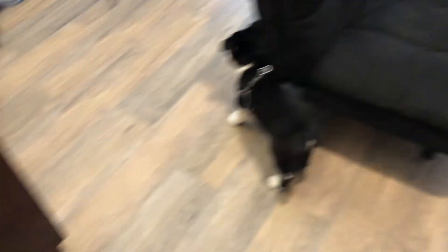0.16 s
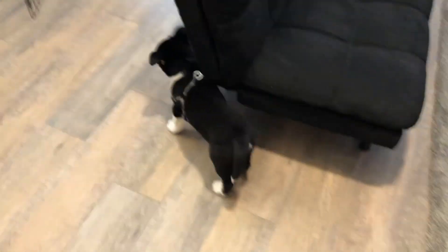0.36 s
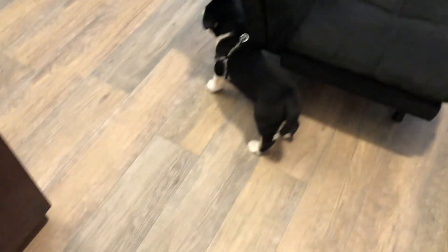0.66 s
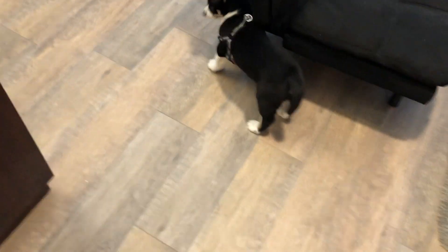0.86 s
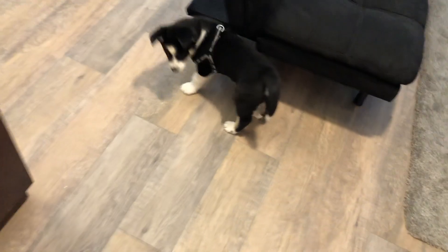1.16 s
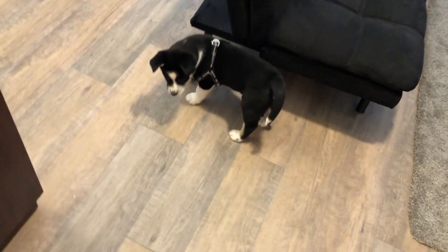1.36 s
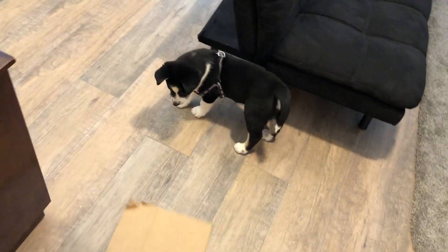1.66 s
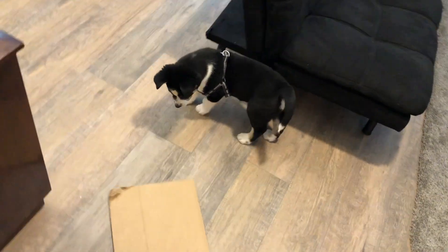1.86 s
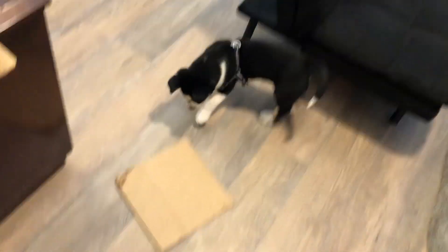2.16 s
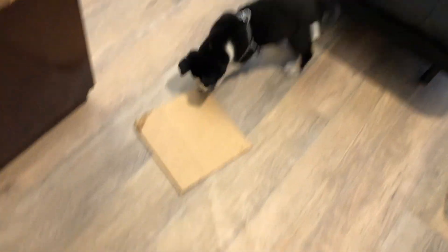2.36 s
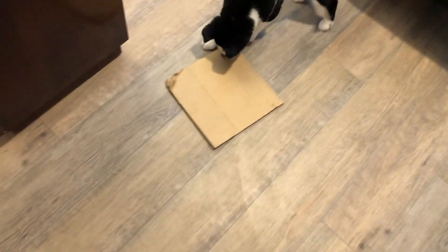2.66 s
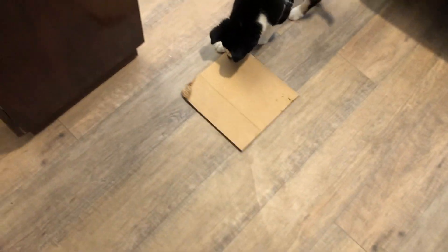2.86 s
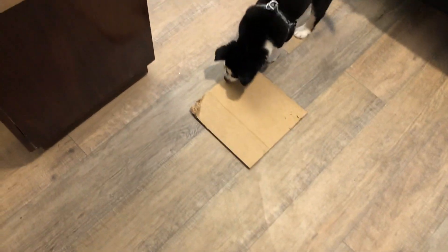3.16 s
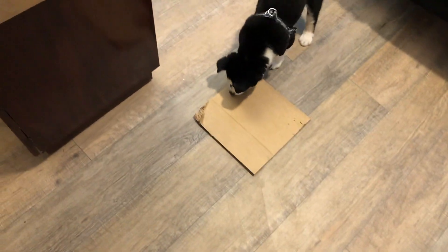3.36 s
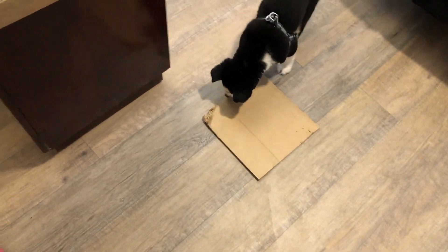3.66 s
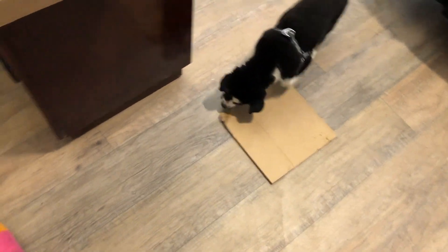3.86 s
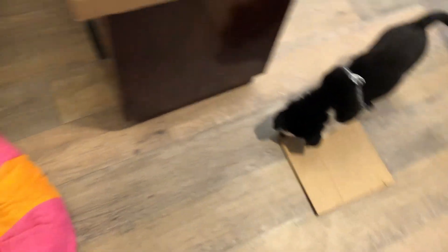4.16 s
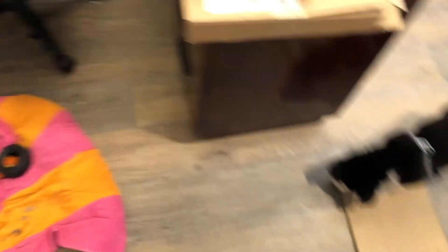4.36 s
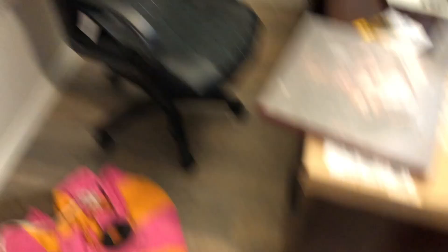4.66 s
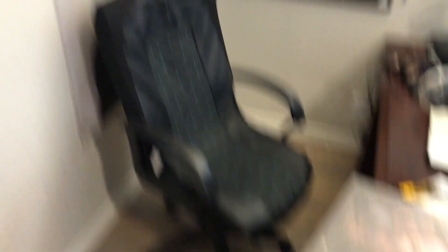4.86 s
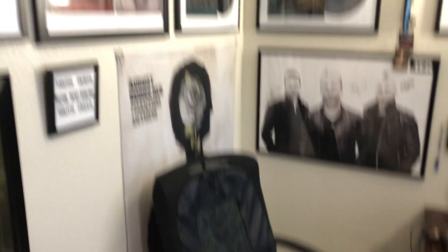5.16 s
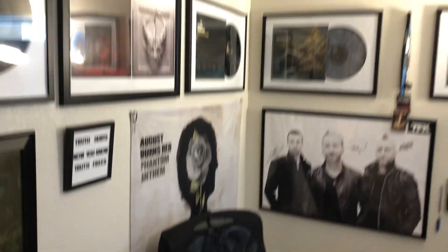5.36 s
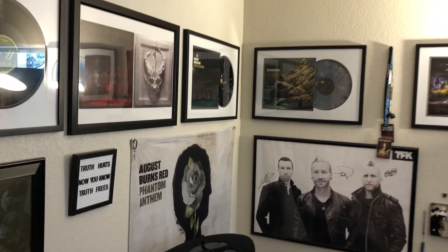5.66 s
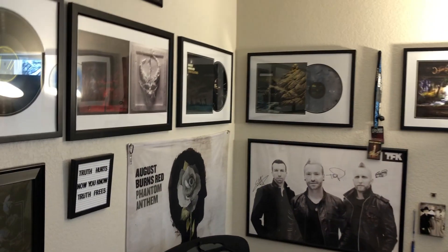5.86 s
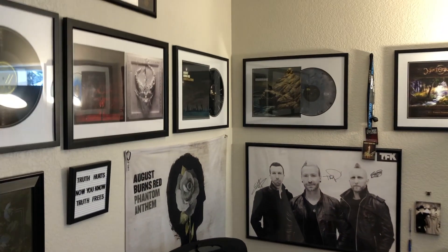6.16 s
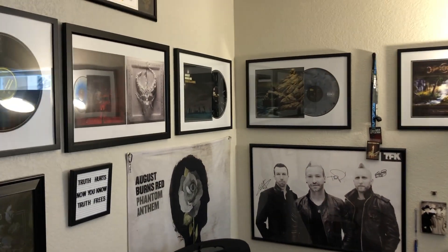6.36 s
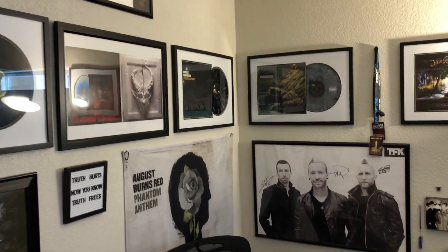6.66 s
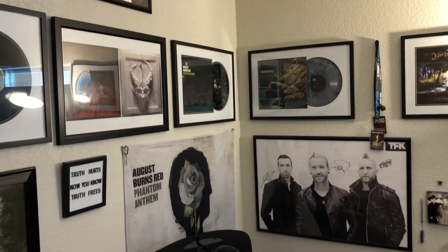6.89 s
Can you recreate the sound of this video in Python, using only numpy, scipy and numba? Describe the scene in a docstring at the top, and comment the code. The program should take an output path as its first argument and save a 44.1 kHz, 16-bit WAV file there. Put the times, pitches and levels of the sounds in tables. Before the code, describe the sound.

Close cardboard scraping and claw clicks on a hard floor in a small room, soft thuds, and later a sharp hollow knock with rebounds.

```python
"""Dense scrapes, ticking, soft thuds, one hard hollow knock and a faint whistle, over a quiet hum.
A puppy noses a sheet of corrugated cardboard about on a hard floor in a small room, a metre or two from a phone.
Scrapes are random slips in moving bands; claws and flutes tick as short noise bursts; thuds, raps and the knock
ring decaying modes. The room adds a brief diffuse tail; the phone's microphone thins the deep bass of the
nearby sounds and cuts the top of everything."""
import sys
import numpy as np
from scipy import signal
from scipy.fft import rfft, irfft
from scipy.io import wavfile
from scipy.ndimage import uniform_filter1d
from numba import njit

SR = 44100
rng = np.random.default_rng(int(sys.argv[2]) if len(sys.argv) > 2 else 0)


def dump(signal):
    """Clip the signal to [-1, 1] and save it as 16-bit WAV at the path in sys.argv[1]."""
    limited = np.clip(np.atleast_2d(signal).T, -1, 1)
    pcm = np.round(limited * 32767).astype(np.int16)
    wavfile.write(sys.argv[1], SR, pcm)


N = 309793

# room tone spectrum, before scaling to AIR_DB: (frequency [Hz], relative level per Hz [dB])
AIR_SPECTRUM = [(15, -36.5), (25, -15.5), (270, 7.5), (326, 6), (416, 4), (463, -1), (516, -2.5),
                (623, -5.5), (817, -39.5), (1290, -10), (3330, -15), (3710, -18.5), (12200, -20.5),
                (16000, -22)]
AIR_DB = -64.5  # rms level, before its slow wavering
# appliance motor hum, each line wavering about its level: (frequency [Hz], rms level [dB])
HUM_LINES = [(59.2, -79), (118.4, -77), (177.6, -84.5), (414.5, -74.5), (516.8, -72.5), (576.0, -77.5),
             (807.5, -84)]

# short shoves and stirrings of the sheet: (time at full level [s], rasp level [dB], rise [s], hold [s],
# fade [dB/s], rasp centre [Hz], rasp sharpness [Q], then relative to the rasp level:
# body [dB], fine grit [dB], floor rumble [dB])
SHOVES = [(0.03, -58.5, .05, .03, 102, 2000, 1.5, 5.5, -10, -4.5),
          (0.11, -42, 0.065, .01, 118, 5700, .4, -4.5, -3.5, -21.5),
          (0.18, -54, 0.021, .01, 116, 3920, 0.34, 3.5, 3.5, 3),
          (0.286, -58.5, 0.014, 0.0196, 137.5, 1800, 1.2, 5.5, -1.5, 9),
          (0.424, -61, 0.014, 0.014, 98, 2500, 1.4, 4, 5, 0),
          (0.565, -56, 0.0024, 0.0063, 400, 2580, 2.9, 4.5, -3, 3),
          (0.581, -52.5, .02, .02, 95, 2600, 1.7, 3.5, -5.5, 8),
          (0.661, -58.5, .01, .008, 303, 2500, 1.5, -5, 14, -8),
          (0.672, -24, 0.012, .001, 301, 2400, 1.1, -12.5, -34, -28),
          (0.699, -35, .02, .02, 109, 2520, 0.57, -9, -30.5, -27),
          (0.766, -40, 0.093, 0.012, 141.5, 4480, .5, -11, -11, -21.5),
          (0.955, -66.5, 0.055, 0.031, 61, 2400, 0.76, 1, -1, 8),
          (2.202, -47, .01, .04, 132, 2640, 1.3, -5.5, -15, -13.5),
          (2.468, -62, .1, .005, 114, 3300, 1.1, -19, -9, -8),
          (2.578, -43, .015, .012, 800, 5500, 1.5, -22.5, -13.5, -31),
          (2.626, -46, .06, .005, 122.5, 5100, 0.62, -10, -18.5, -14.5),
          (3.114, -66.5, .03, .04, 200, 3000, 1.2, -12.5, -7.5, -17),
          (3.254, -69, .05, .005, 128.5, 4580, 1.2, -29, -4.5, -18),
          (3.448, -69.5, .05, .005, 103, 4750, 1.3, -9, -2.5, -9),
          (3.638, -71.5, .1, .005, 82.5, 2470, 1.2, -4.5, -13, -3),
          (3.816, -53, .01, .04, 96, 2700, .9, -9.5, -8.5, -19),
          (3.945, -52.5, 0.11, 0.017, 129, 3340, 0.65, -7, -8.5, -12),
          (4.254, -69.5, .02, .09, 150, 2330, 0.97, 0.5, -6, -9),
          (4.388, -50.5, .016, .07, 124, 3000, 0.44, -19, -11, -30),
          (4.52, -67.5, 0.23, 0.013, 117, 1620, 4.3, 7.5, -20, -2),
          (4.744, -67, .2, .005, 65, 1750, 1.6, 2.5, -21, -4),
          (5.184, -63.5, 0.39, .005, 173, 2030, 1.6, -0.5, -14, -18),
          (5.362, -60.5, .1, .005, 117.5, 2850, .7, -6.5, -6, -46),
          (5.544, -48.5, 0.12, .08, 299, 1900, 0.75, 1.1, -7, -26),
          (5.638, -40.5, 0.007, .076, 190, 2200, .4, 6.5, -23, -16),
          (5.662, -42, 0.024, 0.018, 253, 6020, .6, -9, -6, -25),
          (5.852, -50, 0.11, 0.017, 103, 2940, 0.67, -2, -6.5, -21),
          (5.93, -62.5, .15, .005, 102.5, 2940, 0.83, 1, -3, -27),
          (6.032, -59.5, .1, .005, 43.5, 2130, 1.1, -2, -3.5, -4.5),
          (6.312, -56, .03, .005, 248, 2650, 1.2, -7, -18, -19),
          (6.38, -59.5, .1, .005, 83, 3200, .4, -5.5, -6.5, -18),
          (6.574, -61.5, 0.39, .005, 126, 3250, .8, -7, -4, -19),
          (6.78, -61.5, 0.11, 0.0069, 204, 3700, .9, -4, -6, -12),
          (6.842, -46, 0.071, .005, 134, 3300, 0.8, -10.5, -7, -12)]
RISE_DB = 22.5  # climb to full level over the rise time
SAG_S, SLOW_HZ = .25, 2400  # the rasp centre moves toward SLOW_HZ with this time constant as a shove slows
LOW_FADE, GRIT_FADE = 0.84, 1.87  # fade rates of body and rumble, and of grit, relative to the rasp
# the long skid across the floor:
# (time [s], rasp level [dB], rasp centre [Hz], body level [dB], grit level [dB])
SKID = [(1.145, -68, 4070, -58, -68), (1.168, -44, 4520, -61.5, -50), (1.177, -25, 5260, -51.5, -39),
        (1.25, -24.5, 6000, -49.5, -36.5), (1.3, -31, 4650, -52.5, -46), (1.352, -32, 3580, -52, -48),
        (1.378, -29, 3150, -56.5, -45), (1.46, -30, 3550, -43.5, -48), (1.546, -32.5, 3100, -51, -51),
        (1.594, -27, 2900, -39.5, -38.5), (1.628, -31, 2910, -44, -43), (1.7, -38.5, 3500, -49.5, -50),
        (1.742, -36.5, 3790, -49.5, -41), (1.764, -41, 3470, -56, -76), (1.844, -46, 3420, -54.5, -56),
        (1.95, -48.5, 3290, -63.5, -58), (2.09, -46.5, 3100, -55.5, -60), (2.18, -60.5, 3000, -64, -77)]
SKID_SHARPNESS_PER_KHZ, SKID_RUMBLE_DB = 0.2, -64.5  # the brighter, the sharper the rasp
# the sheet never lies quite still: (rasp [dB], body [dB], grit [dB], rumble [dB])
STIR_DB = (-80, -72, -88, -89)

# room decay by band: (centre [Hz], t60 [s])
ROOM_DECAY = [(150, 0.19), (450, 0.76), (1200, 0.82), (3000, 0.45), (7000, 0.17), (12000, 0.88)]
ROOM_DB = -13  # gain of the unit-energy tail

# claws and flutes catching: (time [s], peak level [dB], centre [Hz], relative snap gain [dB])
TICKS = [(0.08, -30, 7240, -11), (0.287, -38.5, 845, -27), (0.563, -46, 2650, -32),
         (0.6729, -15, 2550, -25), (1.149, -45.5, 1490, -14), (1.156, -44, 3000, -14),
         (1.162, -30, 4000, -5), (1.1737, -20, 7260, -26), (1.487, -21.5, 4760, -1),
         (1.5627, -21.5, 3060, -21), (1.5783, -18.5, 3160, -12), (1.5863, -17, 2380, -34),
         (1.6703, -21.5, 2170, -7), (1.7198, -29, 3580, -14), (1.734, -21.5, 3970, -7),
         (1.8392, -36, 3170, 7), (1.849, -35, 9450, -15), (1.8688, -26.5, 3590, 16), (1.891, -32, 6000, -1),
         (1.913, -31, 3590, 11), (1.918, -27.5, 3400, 12), (1.929, -34, 9000, -5), (1.957, -33, 3640, -2),
         (1.991, -32.5, 3170, 9), (1.999, -39, 3300, 3), (2.0314, -31.5, 3590, -9),
         (2.0522, -34, 3200, -14), (2.056, -33.5, 3400, -8), (2.1194, -38, 3160, -11),
         (2.2019, -40, 1400, -31), (2.2406, -40.5, 2130, -1), (2.39, -54, 6000, -1),
         (2.5745, -44, 5100, -12), (2.588, -35, 6700, -8), (2.62, -32, 5600, -12), (3.117, -61, 2540, -6),
         (3.257, -52.5, 5910, -8), (3.311, -56, 3600, -4), (3.443, -58, 5000, -5),
         (3.4715, -52.5, 6800, -6), (3.8205, -43.5, 2330, -26), (3.839, -42, 2920, -11),
         (3.8916, -40, 5150, -13), (5.3542, -47.5, 2450, -8), (5.643, -15.5, 1030, -32),
         (5.6721, -27, 1130, -14), (5.8518, -37.5, 897, -13), (6.3084, -46.5, 2380, -17),
         (6.794, -42.5, 3800, -2), (6.837, -55, 2800, -9)]
TICK_MS = 4.3  # decay time constant of a burst
# stiff patches between the flutes: (centre [Hz], half-width [Hz], gain [dB])
STIFF_PATCHES = [(3150, 55, 6.5), (3715, 47, 3.5), (3790, 83, -5), (5720, 320, -5), (7140, 80, -2.5),
                 (9700, 31, -14), (10100, 110, 1.5), (11400, 74, 1.5)]

# soft blows on the floor, each ringing two board resonances:
# (time [s], peak level of the rings [dB], low [Hz], high [Hz], high relative to low [dB], t60 [s])
THUDS = [(0.287, -33.5, 140.3, 368, -1, 0.26), (.424, -40.5, 143, 685, -7, 0.12),
         (.561, -39.5, 189, 385, 3.5, 0.37), (0.598, -39, 143, 234, -4, .2),
         (.664, -36.5, 423, 783, -10.5, 0.17), (0.699, -39, 125, 293, 16, 0.16),
         (1.575, -36, 297.7, 404, -1.5, 0.89), (2.199, -41, 530, 1060, 0, 0.046),
         (3.816, -51, 189, 396, 9, 0.13)]

# a claw rapping something stiff: (time [s], peak level [dB], contact [ms])
RAPS = [(4.386, -33.5, .06), (4.394, -30.5, .06), (4.405, -49, .06), (4.43, -44, .06), (4.445, -39, .06)]
# resonances of the stiff thing: (frequency [Hz], relative level [dB], t60 [s])
RAP_MODES = [(1480, -25, .02), (1670, 2, 0.034), (1740, 4, 0.035), (1800, -1, .025), (3660, -4, 0.077),
             (3990, 1, 0.052), (4240, -9, 0.022), (5100, -2, 0.028), (5100, 5.5, 0.046), (5450, 2, 0.031),
             (6600, 2, 0.016), (7300, 2, .015)]
# the hard knock and its rebounds: (time [s], peak level [dB], contact [ms])
KNOCKS = [(5.637, -4, 0.56), (5.6415, -8, 0.89), (5.6495, -16, 0.95), (5.678, -16, 0.62),
          (5.703, -14.5, 0.24)]
# resonances of the hollow thing: (frequency [Hz], relative level [dB], t60 [s])
BOX_MODES = [(120.2, -10.5, 0.36), (240, -34, .1), (252, -22.5, 1), (295.5, -5.5, 0.47), (373, -15, 0.31),
             (392.6, 6, 0.093), (454, 5, 0.028), (521, 10, 0.068), (549, -3, 0.075), (617, -4, 0.12),
             (584, 8, 0.074), (670.6, 3.5, 0.19), (740, -34.5, 0.088), (950, -22, .06), (1050, -21, 0.12),
             (1320, -23, .12), (1631, -18, .08), (2260, -25, .06)]

# swells of the faint whistle: (start [s], length [s], rms level at the crest, before wavering [dB])
WHISTLES = [(5.98, .07, -65), (6.086, 0.051, -63), (6.24, .055, -69)]
WHISTLE_HZ = 1980

BASS_CUT_HZ, TOP_HZ = 122, 15850  # the phone's high-pass, on the nearby sounds only, and its low-pass


def undb(db):
    """Turns decibels into an amplitude factor."""
    return 10 ** (np.asarray(db) / 20)


def unit(x):
    """Scales to rms 1."""
    return x / np.sqrt(np.mean(x ** 2))


def ring_down(t, t60):
    """Exponential decay that falls 60 dB in t60 seconds."""
    return np.exp(-np.log(1000) * t / t60)


@njit
def svf(x, hz, q):
    """State-variable band-pass with a moving centre, gain 1 there."""
    y, b, l = np.empty(len(x)), 0., 0.  # b and l are the band-pass and low-pass states
    for i in range(len(x)):
        g = np.tan(np.pi * hz[i] / SR)
        v = (b + g * (x[i] - l)) / (1 + g * (g + 1 / q[i]))
        b, l, y[i] = 2 * v - b, l + 2 * g * v, v / q[i]
    return y


def band(x, hz, q):
    """One resonance of fixed centre and sharpness."""
    return svf(x, np.clip(hz + np.zeros(len(x)), 20., .45 * SR), np.full(len(x), float(q)))


def between(x, lo_hz, hi_hz):
    """Keeps one band, at rms 1."""
    sos = signal.butter(2, [lo_hz, min(hi_hz, .45 * SR)], "band", fs=SR, output="sos")
    return unit(signal.sosfilt(sos, x))


def walk(rate):
    """Random levels held 1 / rate s and slewed twice; spread near 1."""
    k = max(int(SR / rate), 1)
    held = np.repeat(rng.standard_normal(N // k + 1), k)
    return 1.1 * uniform_filter1d(uniform_filter1d(held, k), k)[:N]


def add(track, s, sound):
    """Lays a sound into the track at s seconds."""
    i = int(s * SR)
    track[i:i + len(sound)] += sound[:N - i]


def air():
    """Room tone, noise of slowly wavering level, with the steady-pitched hum of an appliance motor."""
    hz, db = np.transpose(AIR_SPECTRUM)
    f = np.maximum(np.fft.rfftfreq(N, 1 / SR), 1)
    spectrum = rfft(rng.standard_normal(N)) * undb(np.interp(np.log(f), np.log(hz), db))
    tone = unit(irfft(spectrum, N))
    t = np.arange(N) / SR
    hum = np.zeros(N)
    for line_hz, line_db in HUM_LINES:
        level = undb(line_db + 0.91 * walk(6.1))
        hum += level * np.sqrt(2) * np.sin(2 * np.pi * (line_hz * t + rng.random()))
    return undb(AIR_DB + .8 * walk(1.6)) * tone + hum


def motion():
    """Sums the power of shoves, skid and stirring; rasp centre and sharpness are means weighted by rasp power."""
    t = np.arange(0, N / SR, .001)
    s, db, rise, hold, fade, hz, q, body_db, grit_db, rumble_db = np.transpose(SHOVES)[:, :, None]
    age = np.maximum(t - s, 0)
    coming = db - RISE_DB * np.maximum(s - t, 0) / np.maximum(rise, .002)
    going = fade * np.maximum(age - np.maximum(hold, 0), 0)
    low = coming - LOW_FADE * going
    grit = coming - GRIT_FADE * going + grit_db
    shoves = undb([coming - going, low + body_db, grit, low + rumble_db]) ** 2

    skid_s, *skid = np.transpose(SKID)
    skid_db, skid_hz, skid_body, skid_grit = (np.interp(t, skid_s, c) for c in skid)
    on = (t > skid_s[0]) & (t < skid_s[-1])
    skids = on * undb([skid_db, skid_body, skid_grit, SKID_RUMBLE_DB + 0 * t]) ** 2

    stir = undb(STIR_DB)[:, None] ** 2
    power = shoves.sum(axis=1) + skids + stir

    def mean(shove, glide, rest):
        """Averages a setting, weighted by the rasp power of each movement."""
        return ((shoves[0] * shove).sum(axis=0) + skids[0] * glide + stir[0] * rest) / power[0]

    sagging_hz = SLOW_HZ + (hz - SLOW_HZ) * np.exp(-age / SAG_S)
    centre = mean(sagging_hz, skid_hz, SLOW_HZ)
    sharpness = mean(q, SKID_SHARPNESS_PER_KHZ * skid_hz / 1000, 1.2)
    return [np.interp(np.arange(N) / SR, t, c) for c in (*np.sqrt(power), centre, sharpness)]


def grains(spread_db):
    """Dense random slips, a few larger than the rest."""
    return rng.standard_normal(N) * undb(spread_db * np.minimum(rng.exponential(size=N), 4.5))


def crackle(per_s, spread_db):
    """Single fibres snapping: sparse clicks, each ringing low, middle or high for a fraction of a ms."""
    clicks = (rng.random((3, N)) < per_s / SR) * undb(spread_db * rng.standard_normal((3, N)))
    return unit(sum(band(row, hz, 5.0) for row, hz in zip(clicks, (2600., 4400., 7200.))))


def slide():
    """Fibres slip on the floor: moving rasp, sheet body and fine grit stutter together over a rumble in the boards."""
    rasp_gain, body_gain, grit_gain, rumble_gain, hz, q = motion()
    slips = grains(1.0)
    hz = np.clip(hz * np.exp(0.061 * walk(30)), 20., .45 * SR)
    q = np.clip(q, .3, 6)
    # sqrt(q / hz) offsets the changing bandwidth
    rasp = between(np.sqrt(q / hz) * svf(svf(slips, hz, q), hz, .5 * q), 1300, 8130)
    body = undb(0.37 * walk(25)) * between(grains(1.4), 210, 1366)
    grit = undb(0.61 * walk(15)) * between(band(grains(0.61), 7400.0, 1.0), 6200, 21000)
    rumble = between(rng.standard_normal(N), 115, 240)
    stutter_db = 0.99 * walk(40) + 1.1 * walk(300)
    scrape = rasp_gain * (undb(-2.0) * rasp + undb(-13.0) * crackle(260, 3.0))
    hiss = scrape + body_gain * body + grit_gain * grit
    return undb(stutter_db) * hiss + rumble_gain * rumble


def room(x):
    """A diffuse tail starts after 3 ms, builds over 15 ms and fades at its own rate in each band."""
    t = np.arange(SR) / SR
    tail = sum(ring_down(t, t60) * band(rng.standard_normal(SR), hz, 0.69) for hz, t60 in ROOM_DECAY)
    tail = tail * np.clip((t - .003) / 0.015, 0, 1)
    return undb(ROOM_DB) * signal.fftconvolve(x, tail / np.sqrt(np.sum(tail ** 2)))[:N]


def patches(x):
    """The sheet rings briefly at its stiff patches."""
    return sum(undb(db) * band(x, hz, hz / (2 * width)) for hz, width, db in STIFF_PATCHES)


def ticks():
    """Each catch is a burst of a few ms that rings one spot of the sheet; its broad snap also wakes the stiff patches."""
    out, t = np.zeros(N), np.arange(2048) / SR
    age = t / (TICK_MS / 1000)
    for s, db, hz, snap_db in TICKS:
        burst = rng.standard_normal(len(t)) * np.minimum(age / 0.4, 1) * np.exp(-age)
        snap = band(band(burst, 5500., .6), 5500., .6) + undb(3) * patches(burst)
        spot = band(band(burst, hz, 3.4), hz, 1.2)
        sound = spot + undb(snap_db) * snap
        add(out, s, undb(db) * sound / np.abs(sound).max())
    return out


def thuds():
    """A paw or the sheet lands with a dull slap; two board resonances ring on, roughened as the weight settles."""
    out, t = np.zeros(N), np.arange(SR // 2) / SR
    for s, db, low_hz, high_hz, high_db, t60 in THUDS:
        rings = np.sin(2 * np.pi * low_hz * t) + undb(high_db) * np.sin(2 * np.pi * high_hz * t)
        settle = 1 + 0.21 * unit(uniform_filter1d(rng.standard_normal(len(t)), size=600))
        attack = np.minimum(t / 0.00081, 1)
        sound = rings * settle * attack * ring_down(t, max(t60, .01))
        slap = between(rng.standard_normal(len(t)), 354, 1600) * np.exp(-t / .008)
        add(out, s, undb(db) * (sound / np.abs(sound).max() + undb(-17.5) * slap))
    return out


def blows(events, modes, rattle_db, rattle_t60):
    """A half-sine push of the contact time rings the modes; the loose thing then rattles and keeps feeding them."""
    out, t = np.zeros(N), np.arange(SR // 2) / SR
    hz, mode_db, t60 = np.transpose(modes)[:, :, None]
    rings = np.sin(2 * np.pi * hz * t) * ring_down(t, t60)
    for s, db, ms in events:
        share = undb(mode_db + 0.5 * rng.standard_normal(hz.shape))  # each blow excites the modes a little differently
        push = np.sin(np.pi * np.clip(t[:512] / (max(ms, .06) / 1000), 0, 1))
        rattle = undb(rattle_db) * rng.standard_normal(len(t)) * ring_down(t, rattle_t60)
        rattle[0] = 1  # the blow itself
        sound = signal.fftconvolve(np.convolve(rattle, push), (share * rings).sum(axis=0))
        add(out, s, undb(db) * sound / np.abs(sound).max())
    return out


def raps():
    """A claw's very short contact rings the upper resonances of something stiff."""
    return blows(RAPS, RAP_MODES, rattle_db=-24, rattle_t60=0.13)


def knocks():
    """A hard blow and its rebounds ring the low and middle resonances of something hollow."""
    return blows(KNOCKS, BOX_MODES, rattle_db=-29.5, rattle_t60=0.36)


def whistle():
    """A thin tone, unsteady in pitch and level, that swells and fades."""
    t = np.arange(N) / SR
    swell = sum(undb(db) * np.sin(np.pi * np.clip((t - s) / length, 0, 1)) for s, length, db in WHISTLES)
    level = swell * undb(3 * walk(60))
    cycles = np.cumsum(WHISTLE_HZ + 15 * walk(30)) / SR
    return level * np.sqrt(2) * np.sin(2 * np.pi * cycles)


def scene():
    """Sheet, paws and knocks ring the room; air and whistle are added without that tail, in one channel."""
    near = slide() + ticks() + thuds() + raps() + knocks()
    # the phone thins the deep bass of the nearby sounds
    near = signal.sosfilt(signal.butter(6, BASS_CUT_HZ, "high", fs=SR, output="sos"), near)
    return (near + room(near) + air() + whistle())[None]


def record(dry):
    """The phone cuts the top steeply."""
    return signal.sosfilt(signal.ellip(10, .2, 60, TOP_HZ, fs=SR, output="sos"), dry)


dry = scene()
out = record(dry)
dump(out)
```